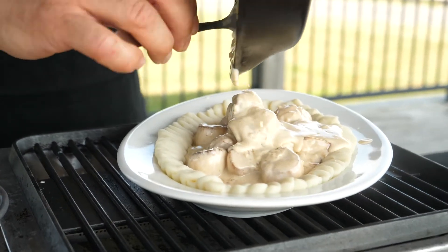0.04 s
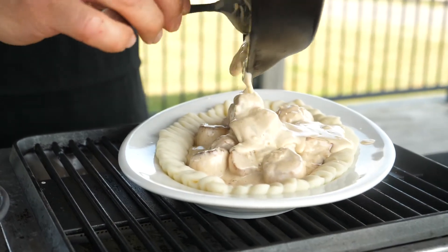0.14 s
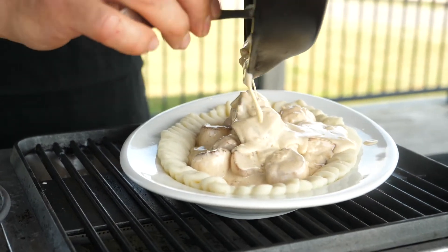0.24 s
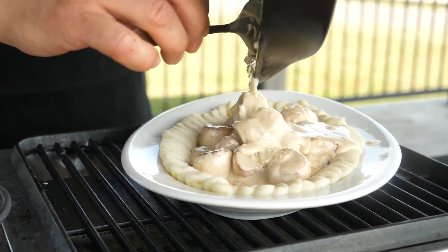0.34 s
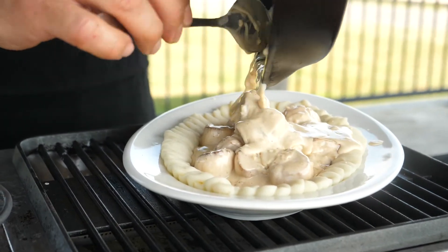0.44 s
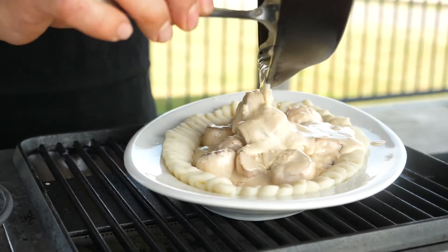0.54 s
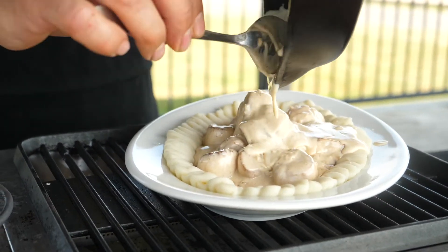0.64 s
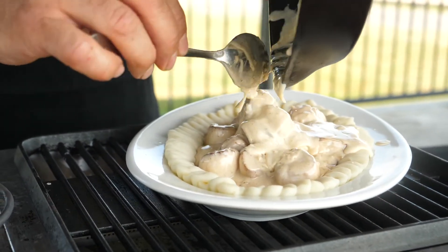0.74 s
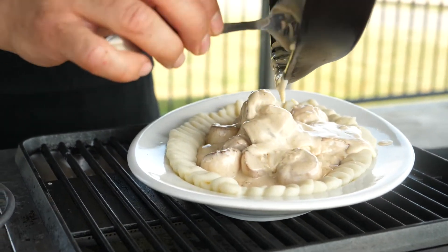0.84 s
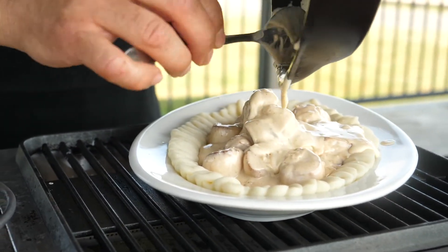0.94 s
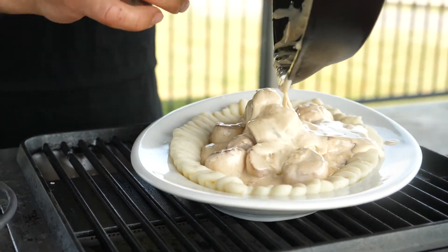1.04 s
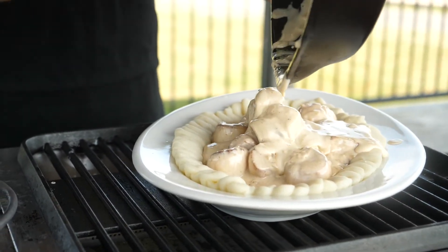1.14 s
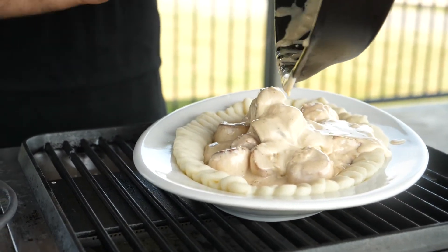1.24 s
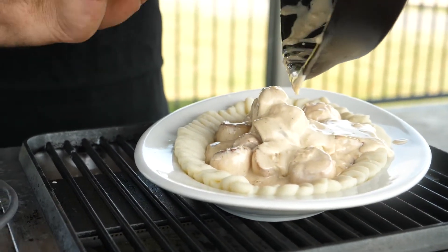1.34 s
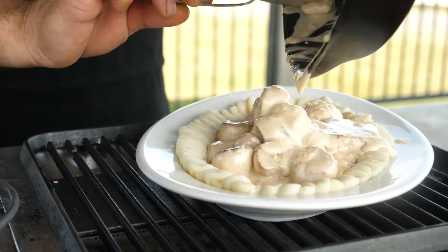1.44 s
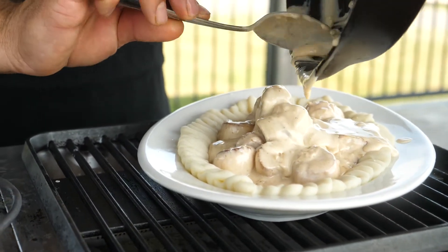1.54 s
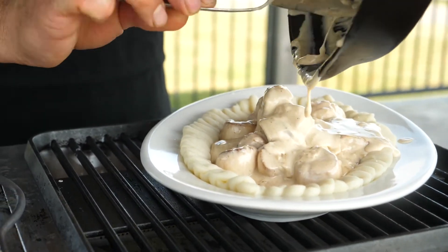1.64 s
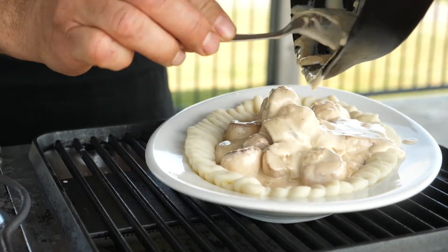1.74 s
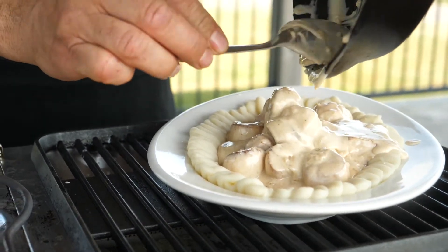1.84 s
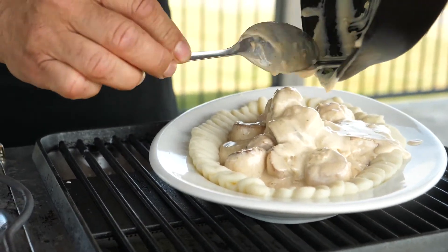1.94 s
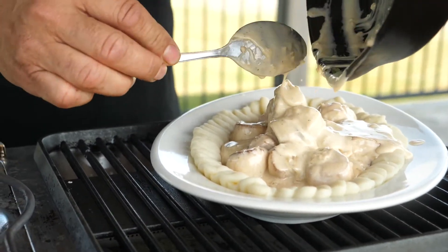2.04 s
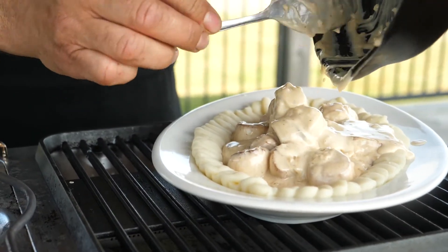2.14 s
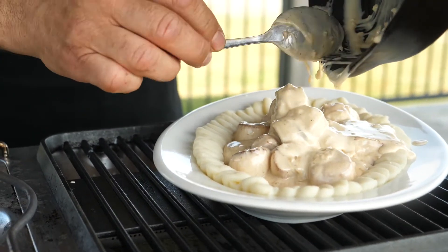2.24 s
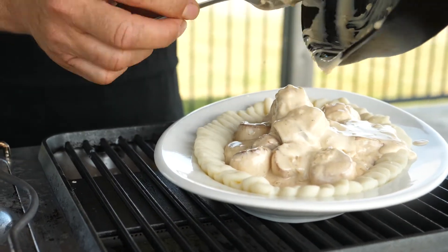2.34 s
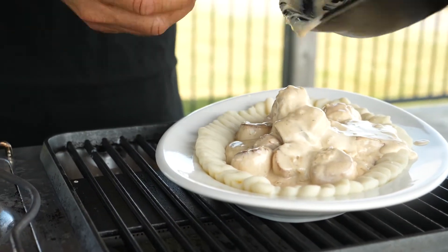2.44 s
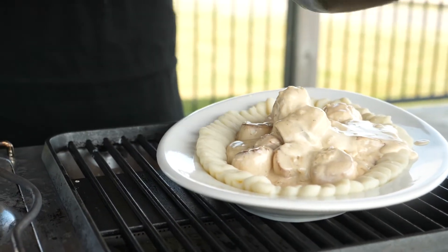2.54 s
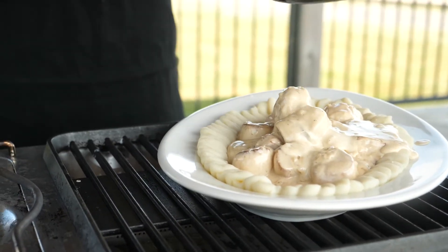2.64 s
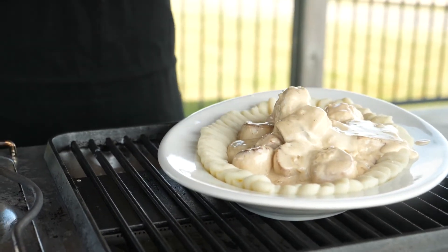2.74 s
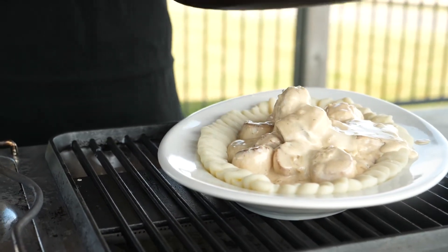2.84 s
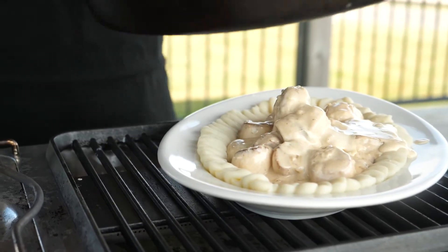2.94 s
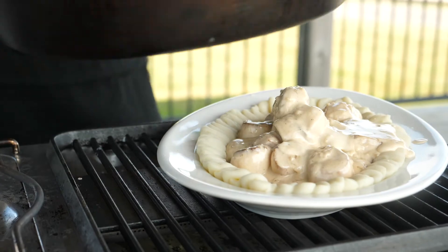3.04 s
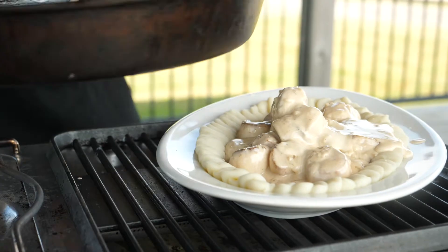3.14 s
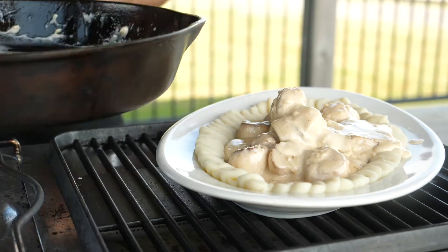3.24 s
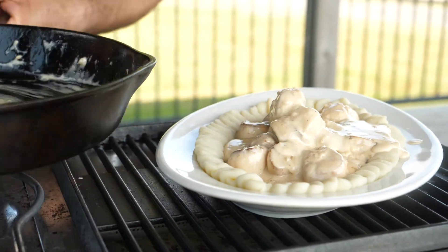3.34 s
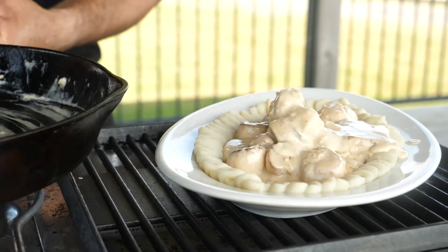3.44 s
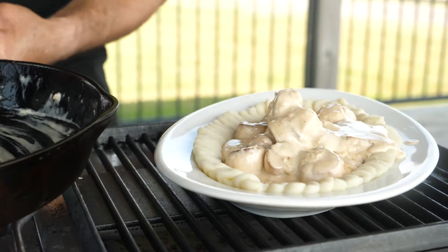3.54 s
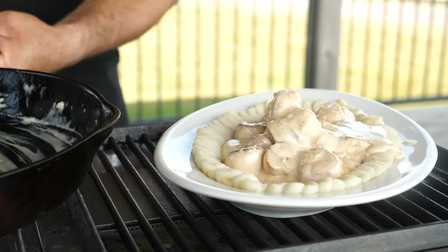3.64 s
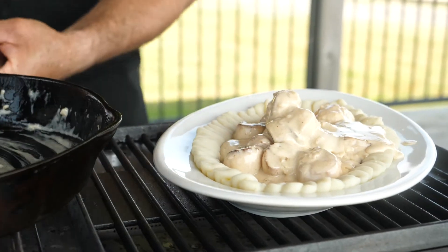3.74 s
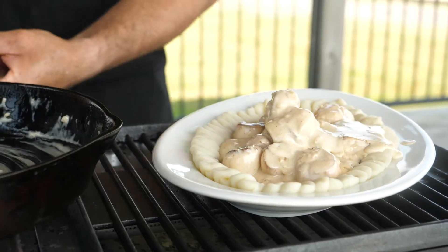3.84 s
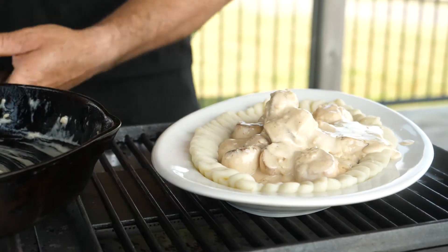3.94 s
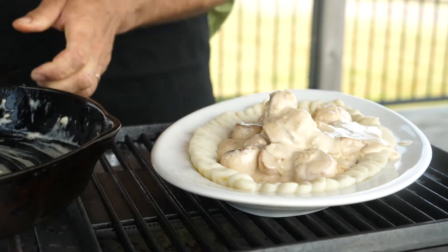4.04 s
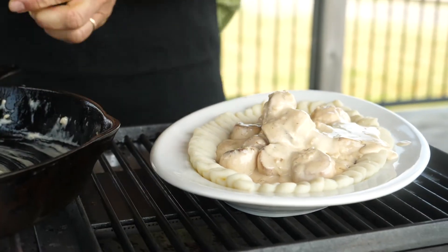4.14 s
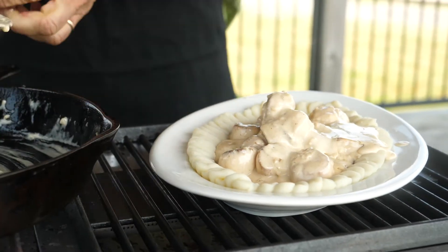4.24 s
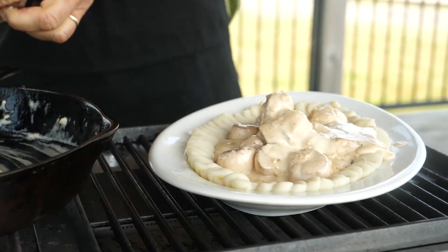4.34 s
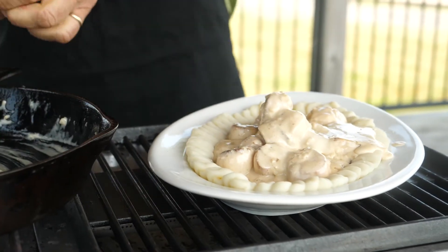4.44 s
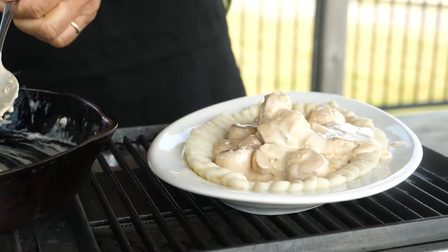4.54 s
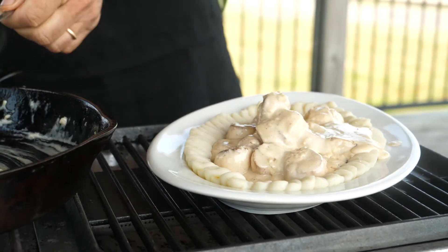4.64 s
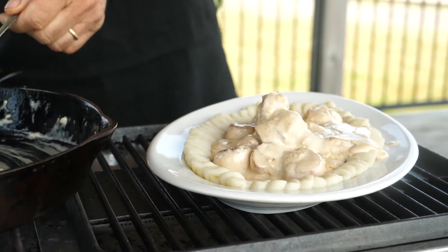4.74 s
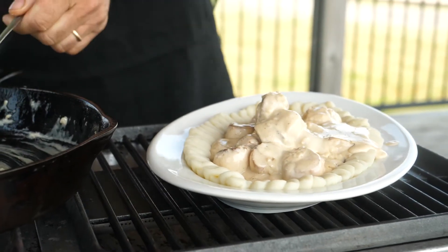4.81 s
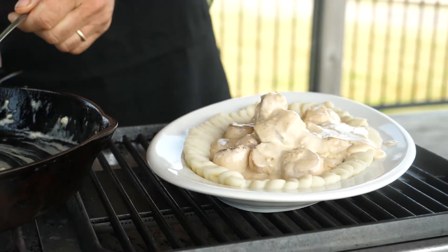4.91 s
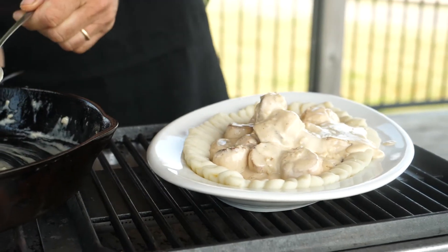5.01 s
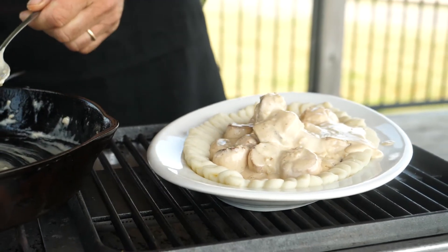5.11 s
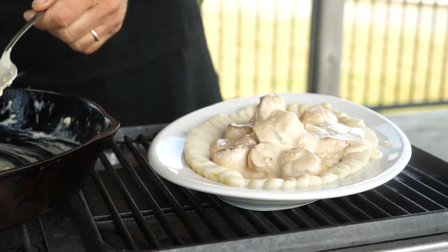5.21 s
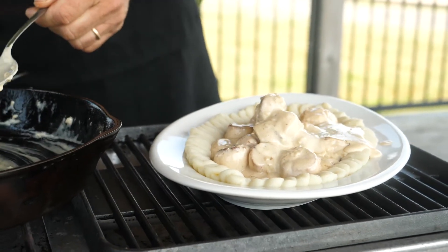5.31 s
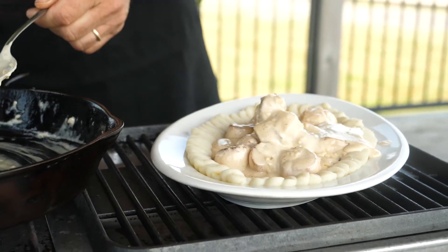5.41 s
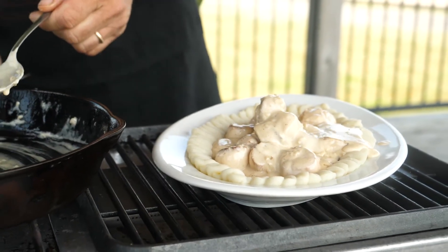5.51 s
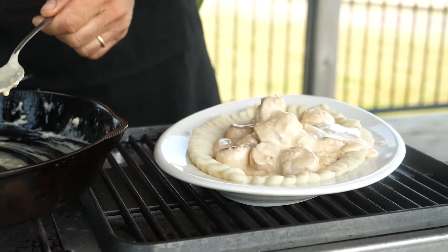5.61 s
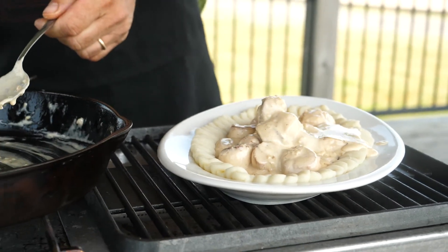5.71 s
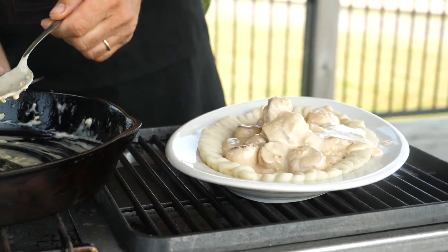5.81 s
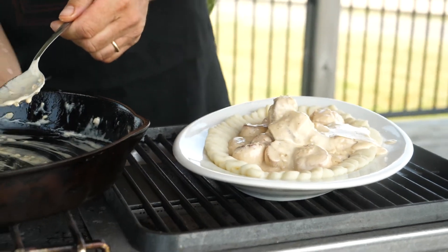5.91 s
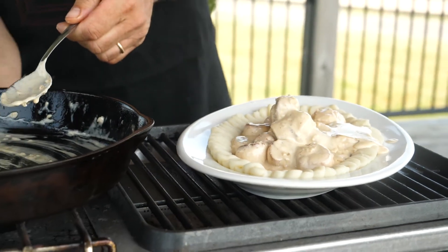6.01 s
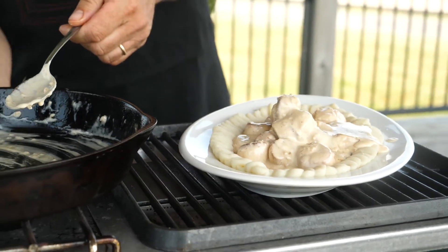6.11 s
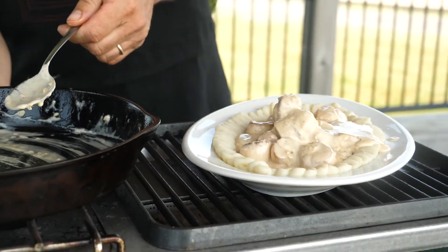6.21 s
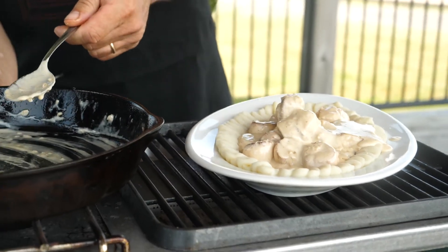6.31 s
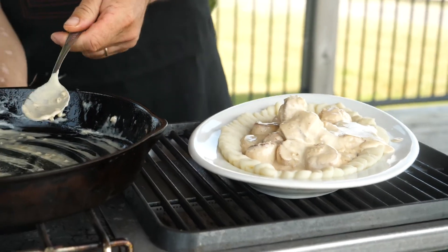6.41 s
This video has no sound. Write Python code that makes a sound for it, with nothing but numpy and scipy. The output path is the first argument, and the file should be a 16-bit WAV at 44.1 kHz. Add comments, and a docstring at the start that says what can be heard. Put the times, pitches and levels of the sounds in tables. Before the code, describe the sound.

A spoon clinks and scrapes in a cast-iron skillet, which is then set down rattling on a grill grate over a faint burner.

```python
"""Outdoors on a porch, close to a gas grill. A steel spoon clinks and scrapes sauce out of a tilted
cast-iron skillet: blows and stick-slip of its edge ring the iron's modes. The skillet is then set on
the grate, where it rocks and rattles to rest. The burner flutters and hisses, and the gap under the
pan rings hollow once it is covered. Faint bands waver in the background hiss. The burner dies down
near the end."""
import sys
import numpy as np
from scipy import signal
from scipy.fft import rfft, irfft, next_fast_len
from scipy.io import wavfile

SR = 44100
rng = np.random.default_rng(int(sys.argv[2]) if len(sys.argv) > 2 else 0)


def waveform_to_disk(signal):
    """Save audio, clipped to [-1, 1], as 16-bit WAV at the path in sys.argv[1]."""
    frames = np.transpose(np.atleast_2d(signal))
    scaled = np.clip(frames, -1, 1) * 32767
    samples = np.round(scaled).astype(np.int16)
    wavfile.write(sys.argv[1], SR, samples)


N = 285182
T = np.arange(N) / SR
RING_T = T[:SR]

# flame noise (frequency [Hz], density [dB])
FLAME_SPECTRUM = [(25, -54.5), (60, -31.5), (110, -12), (170, -3), (300, 0), (450, -7), (580, -9.5),
                  (700, -10), (850, -12), (1150, -10), (1500, -16), (2400, -29.5), (8000, -64.5)]
# flame envelope before flutter and final drop (time [s], level [dB])
FLAME_ENVELOPE = [(0, -54), (1.5, -55.5), (2.2, -57.5), (3.5, -57), (4.3, -56.5), (6.1, -53.5)]
# background hiss (frequency [Hz], density [dB])
HISS_SPECTRUM = [(1180, -21.5), (2000, -6), (2530, -9.5), (3170, -8), (3370, -6.5), (3940, -7.5),
                 (5070, -3), (5540, -11.5), (6040, -6), (6530, -4), (8190, -8), (9490, -9.5),
                 (10900, -12.5), (15200, -19.5), (16000, -23)]
# faint wavering bands in the background hiss (frequency [Hz], width [Hz], gain [dB])
WAVERING_HISS_BANDS = [(3500, 340.6, -17.5), (5230, 580, -16), (5810, 350, -10), (8050, 400, -15),
                       (11500, 1700, -20.5)]
# low puffs of air (time [s], level [dB])
AIR_PUFFS = [(1.381, -59), (5.361, -53.5), (5.479, -53), (5.549, -54), (5.71, -57.5)]
# grate and grill body (frequency [Hz], t60 [s], gain [dB])
GRATE_MODES = [(124.5, 0.96, -21), (304.5, 0.24, -8), (332.3, 0.32, -10.5), (377, 0.17, -8),
               (419, 0.32, -8), (435.3, 0.27, -3.5), (469, 0.14, -6), (539, 0.14, -10.5),
               (556.5, 0.17, -11), (721, 0.087, -5), (1034, 0.18, -8), (1310, 0.17, -20), (1440, 0.27, -28)]
# skillet lying on the grate (frequency [Hz], t60 [s], gain [dB])
RESTING_PAN_MODES = [(944, 0.53, -19), (1426, 0.21, -15), (2100, 0.21, -16.5), (2600, 0.27, -19.5),
                     (2884, 0.2, -9.5)]
# dense grill modes (frequency [Hz], density [dB])
CLATTER_SPECTRUM = [(40, -40.5), (90, -27), (200, -6.5), (400, 4), (750, -5), (1400, -5), (2000, -12.5),
                    (2900, -9), (4000, -10.5), (6000, -5.5), (10000, -14.5), (16000, -32)]
# knocks on the grill (time [s], gain [dB], treble [dB], chatter decay [s])
GRILL_KNOCKS = [(3.6329, -19.5, 4, 0.0095), (3.838, -14.5, -9.5, 0.017), (3.955, -31, 2, 0.0063),
                (4.068, -38.5, -3, 0.0031), (4.735, -39, -13, .0037), (5.41, -42, -23, 0.0032),
                (5.806, -37, -23, 0.0036), (5.896, -43, -22, 0.0028), (6.045, -38.5, -26, 0.046),
                (6.235, -48, -9, .0054), (6.438, -36, -33, 0.017)]
# pan rocking on the bars (time [s], first knock gain [dB], length [s])
ROCKING_RUNS = [(3.705, -32, .06), (3.928, -28.5, .215), (4.193, -41.5, .09)]
# held skillet (frequency [Hz], nominal t60 [s], lip gain [dB], rim gain [dB], wall gain [dB])
SKILLET_MODES = [(489, 0.47, -37.5, -40, -40), (907, 1.3, -31, -37, -48), (940, 0.8, -56.5, -43, -39),
                 (1415.6, 0.7, -41.5, -33.5, -43.5), (1424.4, 0.63, -38, -31.5, -35),
                 (1781, 0.62, -43, -57, -49), (2085, .24, -40, -27, -27.5), (2460, 0.2, -51, -53.5, -33),
                 (2535, 0.3, -42, -49, -33), (2590, .35, -40.5, -49.5, -32),
                 (2831, 0.18, -45, -32.5, -41.5), (3296, .24, -38, -47.5, -36),
                 (3750, 0.29, -38.5, -40.5, -36), (4400, 0.37, -44, -47, -44), (4590, 0.15, -29, -39, -33),
                 (4823, 0.18, -35, -30, -33), (5050, 0.18, -56, -37, -33), (5500, 0.079, -48, -38, -36.5),
                 (5560, 0.11, -32, -34, -25.5), (5860, 0.11, -64, -28.5, -25), (5400, .16, -45, -36, -27),
                 (5920, 0.11, -42, -47.5, -27), (5950, 0.13, -62, -38.5, -18.5),
                 (6368, 0.13, -49, -40, -20.5), (6690, 0.16, -40, -36.5, -26), (6716, 0.083, -45, -43, -30),
                 (7100, 0.059, -37, -42.5, -28), (8010, .11, -25.5, -34.5, -41), (8880, .08, -58, -40, -23),
                 (10600, 0.064, -49, -63, -30)]
# spoon strokes (time [s], length [s], gain [dB], pressure crest [fraction of length])
SPOON_STROKES = [(.04, .075, -43, 0.55), (0.362, 0.024, -35, 0.69), (0.633, 0.1, -38, 0.7),
                 (0.942, 0.047, -43.5, .6), (1.265, 0.31, -40.5, 0.58), (1.872, 0.1, -40.5, 0.75)]
# rasp of the spoon's edge (frequency [Hz], gain [dB])
RASP_SPECTRUM = [(100, -33), (700, -11), (1300, 8), (2500, 0), (3100, 5.5), (4300, 2.5), (6000, 5.5),
                 (8000, 3.5), (10300, -5), (11200, -13), (16000, -28)]
# resonances excited by rubbing (frequency [Hz], width [Hz], gain [dB])
SINGING_MODES = [(2565, 34, -9.5), (5644, 18, -3.5), (5800, 170, -18), (5900, 430, -26), (7700, 110, -21)]
# short modes of spoon and pan (frequency [Hz], density [dB])
CLASH_SPECTRUM = [(40, -43), (300, -39), (1000, -17.5), (3000, -12), (4500, -14), (5800, 0), (8000, 0),
                  (9500, -6.5), (11000, -6), (13000, -18), (16000, -25)]
# spoon blows (time [s], ring gain [dB], place [0 lip, 1 rim, 2 wall], clash gain [dB],
# clash centre [Hz], hardness [dB/octave])
SPOON_BLOWS = [(.008, 1, 0.36, -19, 5300, -3), (.276, -3.5, 1.48, -30, 5500, -4.5),
               (0.3076, -1, 1.42, -20.5, 7300, -4.5), (0.5788, -6, 1.67, -19, 7800, -3),
               (0.919, -0.5, 1.05, -18, 8100, 0), (1.186, -4.5, .4, -33, 4540, -7),
               (1.504, -5, 0.86, -53.5, 5700, 2), (1.789, -2.5, 2.9, -12.5, 6500, 1),
               (2.248, 0, 2.55, -9, 5970, -1)]
# spoon ticking in the hand (time [s], gain [dB])
SPOON_TICKS = [(2.741, -51), (2.747, -42), (2.84, -60)]


def undb(db):
    """Decibels to gain."""
    return 10 ** (np.asarray(db) / 20)


def unit(x):
    """Scale to rms 1."""
    return x / np.sqrt(np.mean(x ** 2))


def add(out, start_s, x):
    """Mix x into out from start_s."""
    i = max(int(start_s * SR), 0)
    out[i:i + len(x)] += x[:max(N - i, 0)]


def ramp(start_s, length_s):
    """Linear rise from 0 to 1."""
    return np.clip((T - start_s) / length_s, 0, 1)


def walk(rate_hz, size=N):
    """Linear glide between Gaussian random values."""
    knots = rng.standard_normal(int(size / SR * rate_hz) + 2)
    return np.interp(T[:size] * rate_hz, np.arange(len(knots)), knots)


def spectrum_gain(spectrum, hz):
    """Gain of a (Hz, dB) spectrum at hz."""
    knots_hz, db = np.transpose(spectrum)
    return undb(np.interp(np.log(hz + 1), np.log(knots_hz), db))


def colour(x, spectrum):
    """Filter x with a (Hz, dB) spectrum."""
    size = next_fast_len(len(x))
    gain = spectrum_gain(spectrum, np.fft.rfftfreq(size, 1 / SR))
    return irfft(rfft(x, size) * gain, size)[:len(x)]


def butter(x, hz, kind, order=2):
    """Butterworth low-pass or high-pass."""
    return signal.sosfilt(signal.butter(order, hz, kind, fs=SR, output="sos"), x + 1e-18)


def resonate(x, hz, width_hz):
    """One resonance; output rms 1."""
    return unit(signal.lfilter(*signal.iirpeak(hz, hz / width_hz, fs=SR), x))


def ring(hz, t60_s, db):
    """Decaying sines of random polarity."""
    out = np.zeros(len(RING_T))
    for mode_hz, life_s, gain in zip(hz, t60_s, undb(db) * rng.choice([-1, 1], len(hz))):
        t = RING_T[:int(life_s * SR)]
        out[:len(t)] += gain * np.sin(2 * np.pi * mode_hz * t) * np.exp(-np.log(1000) * t / life_s)
    return out


def dense_modes(spectrum, t60_s, slope, tilt_db_oct=0):
    """Unresolved modes as decaying noise; t60_s holds at 1 kHz and shortens upward."""
    t = RING_T[:16384]
    hz = np.fft.rfftfreq(len(t), 1 / SR)
    octave = np.log2(np.maximum(hz, 250) / 1000)
    gain = spectrum_gain(spectrum, hz) * undb(tilt_db_oct * octave)
    noise = unit(irfft(rfft(rng.standard_normal(len(t))) * gain))
    bins = rfft(noise)
    out = np.zeros(len(RING_T))
    for centre_oct in (-2, 0, 2, 4):
        band = irfft(bins * np.maximum(1 - abs(octave - centre_oct) / 2, 0))
        out[:len(t)] += band * np.exp(-np.log(1000) * t / (t60_s * 2 ** (-slope * centre_oct)))
    return out


def puffs():
    """Soft, brief swells of bass in the air."""
    out = np.zeros(N)
    window = np.hanning(SR // 14)
    for start_s, db in AIR_PUFFS:
        rumble = butter(rng.standard_normal(len(window)), 182, "low", order=4)
        rumble = butter(rumble, 113, "high", order=4)
        add(out, start_s, undb(db) * window * unit(rumble))
    return out


def background_hiss():
    """Broad background hiss with faint wavering bands."""
    hiss = undb(-1) * unit(colour(rng.standard_normal(N), HISS_SPECTRUM))
    for hz, width_hz, db in WAVERING_HISS_BANDS:
        gain = undb(db + 2.3 * walk(4))
        band = resonate(rng.standard_normal(N), hz, width_hz)
        hiss += gain * resonate(band, hz, width_hz)
    return hiss


def flame(dying):
    """Fluttering flame noise; the bass gutters most."""
    level_db = np.interp(T, *np.transpose(FLAME_ENVELOPE)) - 7.5 * dying
    flutter = unit(colour(rng.standard_normal(N), FLAME_SPECTRUM)) * undb(level_db + 1.1 * walk(18))
    return flutter + butter(flutter, 170, "low") * (undb(1.3 * walk(5.4)) - 1.1)


def pan_gap():
    """Hollow resonance under the pan; builds once the pan covers the flame."""
    covered = ramp(start_s=3.74, length_s=0.45)
    tone = resonate(rng.standard_normal(N), hz=1113, width_hz=38)
    return resonate(tone, hz=1136, width_hz=150) * covered * undb(2 * walk(5))


def burner():
    """Flame, hiss and gap. Hiss and hollow tone surge once; later the hiss drops, then the flame."""
    hiss_drop = ramp(start_s=5.93, length_s=0.073)
    dying = ramp(start_s=6.13, length_s=0.073)
    surge_db = 7.5 * np.exp(-((T - 4.71) / 0.058) ** 2)
    flutter = flame(dying)
    hiss = background_hiss() * undb(-64.5 + surge_db - 5 * hiss_drop)
    hollow = pan_gap() * (1 - dying) * undb(-60 + surge_db)
    return flutter + hiss + hollow


def rocking():
    """Pan rocks on the bars: nearly even, fading knocks, as GRILL_KNOCKS rows."""
    gap_s, jitter_s, chatter_s = 0.0335, 0.002, 0.0064
    fade_db_per_s, scatter_db = 55.5, 2.5
    rows = []
    for start_s, first_db, length_s in ROCKING_RUNS:
        scatter = rng.standard_normal((32, 3))
        for after_s, (late, loud, bright) in zip(np.arange(0, length_s, gap_s), scatter):
            db = first_db - fade_db_per_s * after_s + scatter_db * loud
            treble_db = -13 + scatter_db * bright
            rows.append((start_s + after_s + jitter_s * late, db, treble_db, chatter_s))
    return rows


def knocks():
    """Iron chatters on the loose grate; grate, grill and damped pan respond."""
    contacts_per_s, split_hz = 1500, 1600
    dull, bright = np.zeros((2, N))
    t = RING_T[:SR // 10]
    swell = 1 - np.exp(-RING_T / 0.0048)  # heavy parts take a few ms to move
    for start_s, db, treble_db, chatter_s in GRILL_KNOCKS + rocking():
        contacts = (rng.random(len(t)) < contacts_per_s / SR) * rng.standard_normal(len(t))
        contacts *= np.exp(-t / chatter_s)
        contacts[0] += 0.8  # first impact
        clatter = dense_modes(CLATTER_SPECTRUM, t60_s=0.16, slope=0.31)
        clatter += undb(-33.5) * dense_modes(CLATTER_SPECTRUM, t60_s=0.93, slope=0.24)
        grate = undb(-3) * ring(*np.transpose(GRATE_MODES))
        pan = undb(-4.5) * ring(*np.transpose(RESTING_PAN_MODES))
        blow = swell * (grate + pan)
        rattle = signal.fftconvolve(clatter[:SR // 2], contacts / np.linalg.norm(contacts))
        blow[:len(rattle)] += rattle
        add(dull, start_s, undb(db) * blow)
        add(bright, start_s, undb(db + treble_db) * blow)
    return butter(dull, split_hz, "low") - butter(bright, split_hz, "high")


def skillet(place, mute=0):
    """Iron ring: contact place weights the modes, lasting contact mutes the high ones."""
    hz, t60_s, *place_db = np.transpose(SKILLET_MODES)
    db = [np.interp(place, [0, 1, 2], row) for row in np.transpose(place_db)]
    return ring(hz, 0.99 * t60_s / (1 + mute * (hz / 2500) ** 2), db)


def stroke_pressure(length_s, crest):
    """Spoon bites, bears down to the crest and lifts; the edge catches and lets go."""
    attack_s, lift_db_per_s = 0.019, 452
    t = T[:int((length_s + 40 / lift_db_per_s) * SR)]
    progress = np.minimum(t / length_s, 1)
    arch_db = -9.5 * ((progress - crest) / max(crest, 1 - crest)) ** 2
    judder_db = 2 * walk(60, len(t))
    lift_db = lift_db_per_s * np.maximum(t - length_s, 0)
    return np.minimum(t / attack_s, 1) * undb(arch_db + judder_db - lift_db)


def scrapes():
    """Spoon edge on grainy iron: dense slips rasp, sing and keep the pan ringing."""
    slips_per_s = 5000
    out = np.zeros(N)
    for start_s, length_s, db, crest in SPOON_STROKES:
        pressure = undb(db) * stroke_pressure(length_s, crest)
        n = len(pressure)
        slips = (rng.random(n) < slips_per_s / SR) * rng.standard_normal(n)
        slips = unit(slips * undb(2 * walk(110, n)))
        # resonances come and go as the contact travels
        bands_hz = np.geomspace(800, 15000, 44) * 2 ** (0.02 * rng.standard_normal(44))
        edge = sum(undb(3.5 * walk(22, n)) * np.sqrt(hz) * resonate(slips, hz, hz / 45)
                   for hz in bands_hz)
        rasp = unit(colour(edge, RASP_SPECTRUM))
        singing = sum(undb(mode_db + 2 * walk(26, n)) * resonate(slips, hz, width_hz)
                      for hz, width_hz, mode_db in SINGING_MODES)
        add(out, start_s, (rasp + undb(0.5) * singing) * pressure)
        pan = skillet(place=1.83, mute=0.93)
        add(out, start_s, undb(3) * signal.fftconvolve(slips * pressure, pan / np.linalg.norm(pan)))
    return out


def clinks():
    """Spoon blows: crack, clash of short modes, pan ring, faint porch tail. Then ticks in the hand."""
    out = np.zeros(N)
    hz = np.linspace(3200, 15800, 100) + rng.uniform(-60, 60, size=100)
    t60_s = 0.071 * (hz / 6000) ** -0.7 * np.exp(0.28 * rng.standard_normal(len(hz)))
    for start_s, ring_db, place, clash_db, centre_hz, hard_db_oct in SPOON_BLOWS:
        octave = np.log2(hz / centre_hz)
        bump_db = 6 * np.exp(-(octave / 0.13) ** 2)  # resonance of the spoon part that lands
        scatter_db = 3.8 * rng.standard_normal(len(hz))
        gain = spectrum_gain(CLASH_SPECTRUM, hz) * undb(bump_db + hard_db_oct * octave + scatter_db)
        modes_db = 20 * np.log10(gain / np.linalg.norm(gain))
        clash = undb(5) * butter(ring(hz, t60_s, modes_db), 2000, "high")
        crack = undb(5) * dense_modes(CLASH_SPECTRUM, t60_s=0.012, slope=0.1, tilt_db_oct=hard_db_oct)
        porch = undb(-32) * dense_modes(CLASH_SPECTRUM, t60_s=0.55, slope=0.2, tilt_db_oct=-2)
        add(out, start_s, undb(ring_db) * skillet(place) + undb(clash_db) * (crack + clash + porch))
    for start_s, db in SPOON_TICKS:
        add(out, start_s, undb(db) * dense_modes(CLASH_SPECTRUM, t60_s=0.0084, slope=0.1))
    return out


def scene():
    """Mono mix; the metal radiates little deep bass."""
    spoon = butter(clinks() + scrapes(), 260, "high")
    grill = butter(knocks(), 122, "high", order=4)
    return (butter(spoon + grill, 60, "high") + burner() + puffs())[None]


def record(dry):
    """Soft peak limit, then a steep low-pass."""
    ceiling, top_hz = 0.8, 16000
    limited = dry / (1 + (dry / ceiling) ** 8) ** (1 / 8)
    return signal.sosfilt(signal.ellip(10, 0.1, 90, top_hz, fs=SR, output="sos"), limited)


dry = scene()
out = record(dry)
waveform_to_disk(out)
```